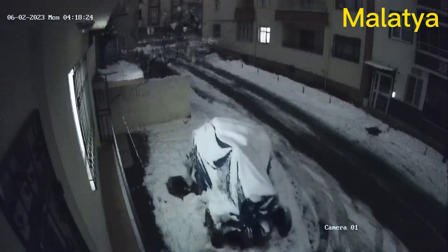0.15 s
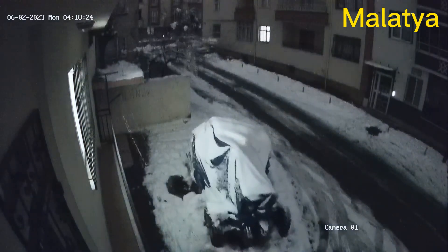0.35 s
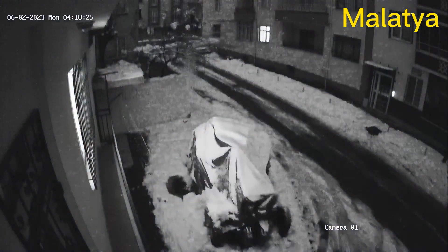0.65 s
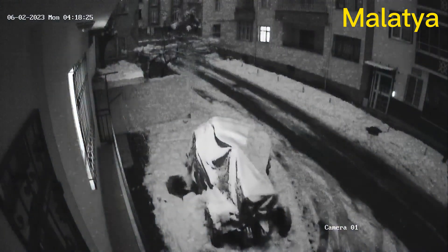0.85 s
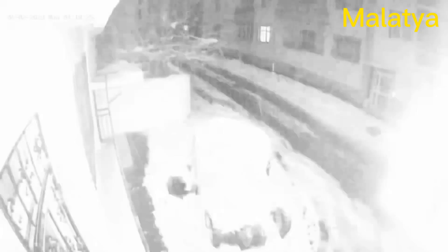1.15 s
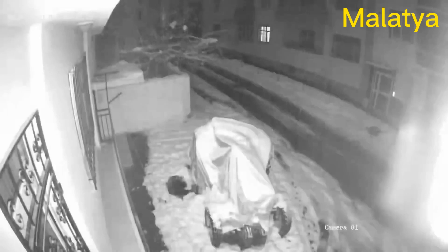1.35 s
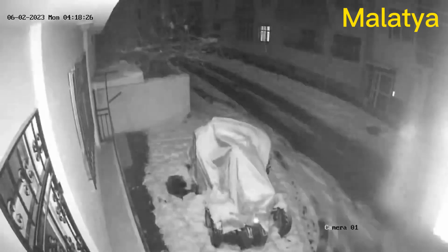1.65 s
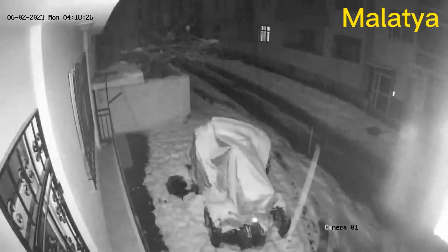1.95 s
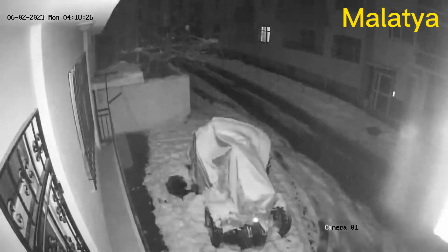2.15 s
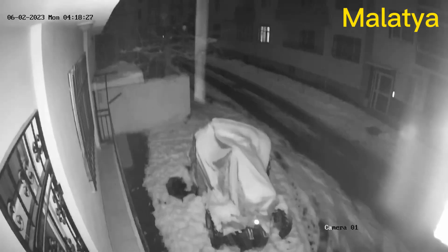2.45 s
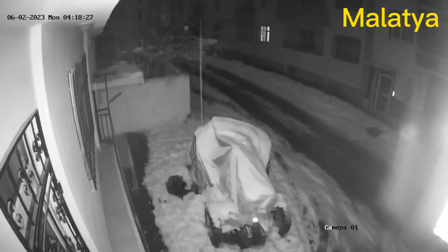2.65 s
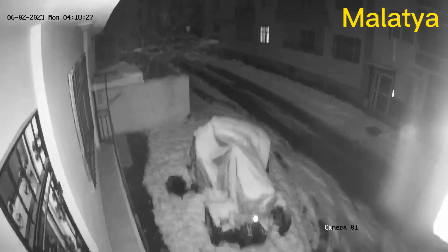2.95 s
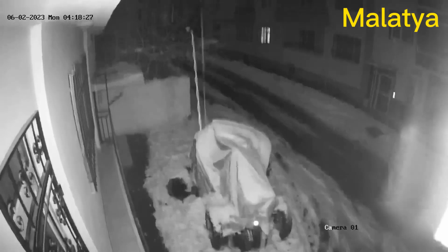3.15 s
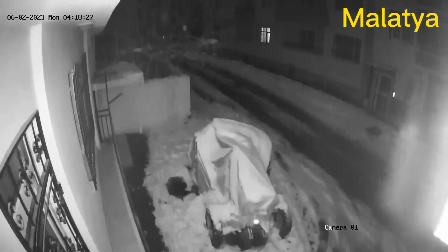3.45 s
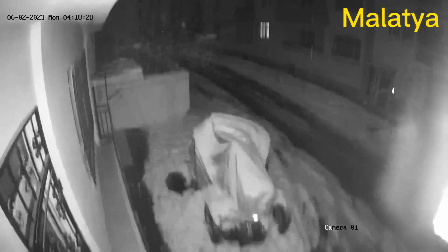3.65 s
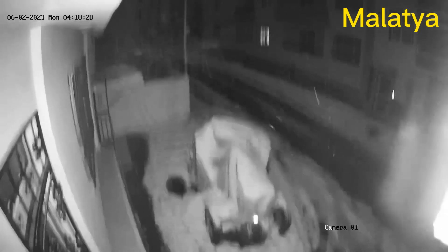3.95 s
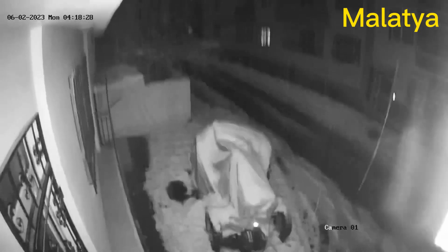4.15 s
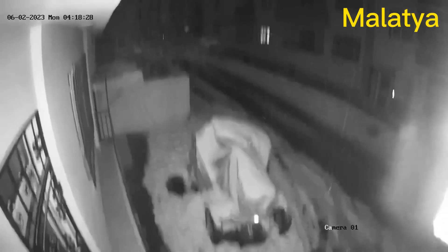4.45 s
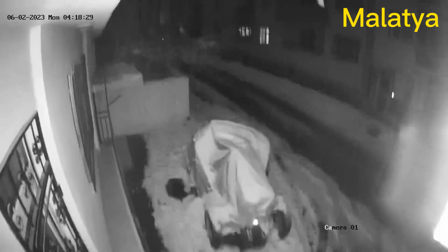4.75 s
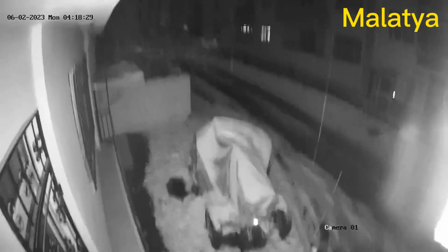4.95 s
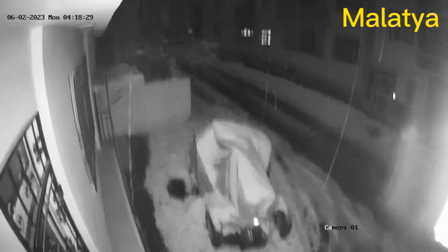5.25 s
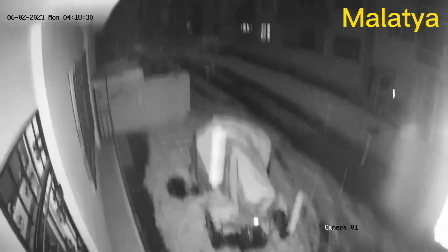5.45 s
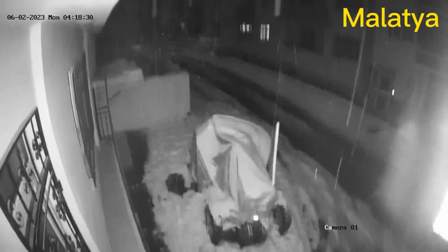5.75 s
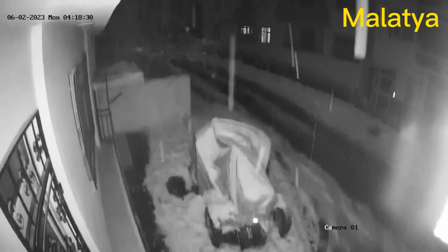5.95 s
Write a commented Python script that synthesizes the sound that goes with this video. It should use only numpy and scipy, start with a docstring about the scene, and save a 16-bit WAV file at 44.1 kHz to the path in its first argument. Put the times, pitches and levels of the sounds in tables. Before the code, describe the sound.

Outside flats on a snowy street at night, a fairly quiet gritty roar of shaking walls is scattered with loose metal clatter and debris ticks. A metal shutter suddenly chatters and bangs, a sharp crack follows, then the ground rumble surges. The roar stays loud with brief dropouts, ending in crowded cracks and ringing metal blows. A narrow, overdriven outdoor camera microphone dulls and flattens it.

```python
"""An earthquake shakes a street of flats, heard by a security camera on an outside wall.
From the start walls and ground roar, loose metalwork clatters, debris ticks and the camera sways.
Blows ring the metal and masonry cracks; then metal squeaks and, at 2.5 s, a shutter chatters and bangs.
The main ground wave lifts the rumble at 3.3 s; soon the sound drops out for moments.
The hardest blows come near the end. A narrow-band sound path limits the loudest peaks throughout."""
import sys
import numpy as np
from scipy import signal
from scipy.io import wavfile
from scipy.ndimage import uniform_filter1d, minimum_filter1d

SR = 44100
rng = np.random.default_rng(int(sys.argv[2]) if len(sys.argv) > 2 else 0)


def transcribe(u):
    """Save the signal u as a 16-bit wav file named by the first command-line argument.

    u: samples, shape (n,) or (channels, n), limited to [-1, 1]; the rate is SR.
    q: integer samples, one column per channel.
    """
    v = np.clip(np.atleast_2d(u).T, -1, 1)
    q = np.round(v * 32767).astype(np.int16)
    wavfile.write(sys.argv[1], SR, q)


N = 268128

# ringing tones (modes) of the loose metalwork: [f/Hz, level/dB, time to fall by 60 dB/s]
METAL_MODES = [(426, -7, 0.16), (696, 4, 0.017), (869, -0.5, 0.17), (1343, -5, 0.066), (1419, -4.5, 0.18),
               (1548, -3, 0.088), (1761, -1.5, 0.021), (2360, 1.5, 0.01), (2690, -9, 0.058),
               (2871, 2.5, 0.031), (3340, -3.5, 0.035), (3447, -3.5, 0.018), (3780, -6, 0.047)]
# ringing tones of the shutter's slats: [f/Hz, level/dB, time to fall by 60 dB/s]
SLAT_MODES = [(1930, -13, 0.29), (2084, -8, 0.063), (2350, -1, 0.06), (2450, -4.5, 0.017), (2835, 5, 0.19),
              (3090, 6, 0.04), (3490, 2, 0.049), (3645, 1.5, 0.055), (3984, 4.5, 0.026)]


def undb(db):
    """Turn decibels into a gain."""
    return 10 ** (np.asarray(db) / 20)


def unit(x):
    """Scale a sound to an average (rms) strength of 1."""
    return x / np.sqrt(np.mean(x ** 2))


def curves(table):
    """Join the points of a [t/s, value, ...] table by straight lines, one curve per value column."""
    s, *columns = np.transpose(table)
    return [np.interp(np.arange(N) / SR, s, column) for column in columns]


def surge(at_s, db, rise_s, fall_s):
    """A level in dB that climbs to a peak and falls away."""
    since = np.arange(N) / SR - at_s
    return db * np.exp(-np.abs(since) / np.where(since < 0, rise_s, fall_s))


def walk(rate):
    """A smooth random curve: steps at `rate` per second, smoothed twice, with a spread near 1."""
    k = int(SR / rate)
    steps = np.repeat(rng.standard_normal(N // k + 1), k)
    return 1.6 * uniform_filter1d(uniform_filter1d(steps, k), k)[:N]


def resonance(x, hz, width):
    """Let through a band around one pitch, with gain 1 at its centre (width in Hz)."""
    return signal.lfilter(*signal.iirpeak(hz, hz / width, fs=SR), x)


def ring(push, mode):
    """A push sets one mode ringing; the longer it rings, the narrower its band."""
    hz, db, t60 = mode
    width = np.log(1000) / (np.pi * max(t60, .01))
    return undb(db) * resonance(push, hz, width) / np.sqrt(width)


def bursts(count, decay):
    """Rows of noise that start at once and die away, one per event (decay in s, to 37 %)."""
    t = np.arange(SR // 3) / SR
    decay_s = np.maximum(np.reshape(decay, (-1, 1)), .0005)
    return rng.standard_normal((count, len(t))) * np.exp(-t / decay_s)


def add(out, s, db, sound):
    """Mix in a short sound at s, scaled by the strength of its loudest 2 ms."""
    at = int(s * SR)
    peak = np.sqrt(2 * np.max(uniform_filter1d(sound ** 2, size=90)))
    out[at:at + len(sound)] += undb(db) * sound / peak


def roar(roar_db, debris_db, rumble_db):
    """Countless far impacts blur into noise bands that throb together and flicker alone."""
    # tone colour of the roar, relative within each of its three parts: [f/Hz, level in 1 Hz/dB]
    roar_colour = [(24, -36), (40, -11), (154, -6.5), (218, -14.5), (412, 2), (490, -5), (693, 3.5),
                   (793, -3.5), (1590, 1.5), (1920, -5.5), (3360, -2), (3700, -2), (4000, -5.5),
                   (5200, -38), (8800, -120)]
    hz_points, db_points = np.transpose(roar_colour)
    parts = np.zeros((3, N))  # rumble, roar of the walls, hiss of debris
    throb = walk(18)
    for hz in 40 * 2 ** np.arange(0, 6.9, 1 / 3):  # three bands per octave
        colour_db = np.interp(np.log(hz), np.log(hz_points), db_points)
        db = colour_db + 0.67 * throb + 0.97 * walk(12)
        band = resonance(resonance(rng.standard_normal(N), hz, hz / 3), hz, hz / 3)
        parts[int(hz > 300) + int(hz > 1800)] += undb(db) * band
    levels = (rumble_db, roar_db, debris_db)
    return sum(undb(db) * unit(part) for db, part in zip(levels, parts))


def clatter(roar_db):
    """Small random knocks ring single modes of the metalwork, as strong as the shaking."""
    rate, scatter_db, contact_s = 50, 2.5, 0.032  # knocks per s in all, spread of sizes, contact decay
    level_db = -9  # against the roar of the walls
    out = 0
    for mode in METAL_MODES:
        hits = rng.random(N) < rate / len(METAL_MODES) / SR
        sizes = undb(scatter_db * rng.exponential(size=N)) * hits
        contact = signal.lfilter([1], [1, -np.exp(-1 / (contact_s * SR))], sizes)
        out = out + ring(contact * rng.standard_normal(N), mode)
    return unit(out) * undb(roar_db + level_db)


def grit(debris_db):
    """Falling plaster and ice tick nearby: brief broad bursts of noise at random moments."""
    rate, scatter_db, contact_s = 77, 4.5, 0.0035  # ticks per s, spread of sizes, decay of each tick
    level_db = -13.5  # against the hiss of debris
    hits = rng.random(N) < rate / SR
    sizes = undb(scatter_db * rng.exponential(size=N)) * hits
    contact = signal.lfilter([1], [1, -np.exp(-1 / (contact_s * SR))], sizes)
    ticks = resonance(contact * rng.standard_normal(N), 3400, 3000)
    return unit(ticks) * undb(debris_db + level_db)


def sway(roar_db):
    """The camera rocks on its bracket: pressure swings below hearing, wider as the shaking grows."""
    base_db, follows, wander_db = -25.5, 0.36, 4  # level at 0 dB roar, dB per dB of roar, slow wander
    jolt_db = surge(2.6, 12, rise_s=.015, fall_s=0.3)  # one hard jerk of the bracket
    noise = rng.standard_normal(N)
    rocking = resonance(noise, 10, 4) + .6 * resonance(noise, 4.3, 6.3)
    db = base_db + follows * roar_db + wander_db * walk(4) + jolt_db
    return unit(rocking) * undb(db)


def nearness(hz, centre_hz, octaves):
    """How strongly a part struck at one pitch drives a mode at another."""
    return np.exp(-.5 * (np.log2(hz / centre_hz) / max(octaves, .02)) ** 2)


def blows():
    """Each blow is a short gritty contact that rings the metalwork's modes near its pitch."""
    # blows on the metalwork: [t/s, peak level/dB, f of the struck part/Hz]
    blow_list = [(0.039, -23.5, 1550), (0.361, -24, 2260), (0.565, -24, 1330), (0.83, -23.5, 1570),
                 (1.18, -21.5, 2790), (1.294, -22, 2890), (1.449, -20.5, 2830), (1.586, -25, 2610),
                 (1.702, -17, 1400), (1.769, -22.5, 1340), (1.958, -23, 1410), (2.244, -20, 1400),
                 (2.876, -8.5, 1810), (3.122, -17.5, 1480), (3.814, -16, 1540), (4.119, -19, 397),
                 (4.184, -9, 680), (4.672, -7, 3750), (5.117, -19, 394), (5.174, -12.5, 711),
                 (5.258, -3, 700), (5.558, -7, 1570), (5.591, -11, 1580), (5.699, 1.5, 2780),
                 (5.774, -6.5, 3830), (5.847, -13, 1280), (5.888, -16, 400), (5.914, 1, 3540),
                 (5.969, 0.5, 3060)]
    spread_octaves, contact_s = .2, 0.0089
    out = np.zeros(N + SR)
    for (s, db, hz), push in zip(blow_list, bursts(len(blow_list), contact_s)):
        ringing = sum(nearness(mode[0], hz, spread_octaves) * ring(push, mode) for mode in METAL_MODES)
        add(out, s, db, ringing)
    return out[:N]


def cracks():
    """Cracks, thuds and sharp ticks do not ring: a sudden burst of noise in one broad band dies at once."""
    # cracks and thuds in the masonry, and sharp broad ticks: [t/s, peak level/dB, centre f/Hz, decay/s]
    crack_list = [(0.049, -15.5, 2000, 0.0073), (0.089, -13.5, 2200, .005), (0.299, -16, 2200, 0.011),
                  (2.375, -16, 2930, 0.0032), (2.585, -9, 1000, 0.055), (2.587, -15, 60, 0.039),
                  (2.874, 6.5, 2940, 0.0053), (2.884, -12, 2530, 0.027), (2.964, -1, 3270, 0.00071),
                  (3.3, -4.5, 3100, 0.0073), (3.336, -14, 100, .025), (3.336, -6.5, 1800, 0.0067),
                  (3.534, -8, 2510, 0.014), (3.699, -4.5, 2450, 0.0033), (4.755, -3, 2020, 0.0067),
                  (4.8, -6, 2000, 0.013), (4.872, 1, 2900, 0.006), (5.117, -0.5, 1800, 0.0027),
                  (5.229, 0, 2500, 0.0086), (5.31, 2.5, 2480, 0.011), (5.351, -9, 2620, 0.0048),
                  (5.55, -3, 2550, 0.0082), (5.615, -4.5, 2460, 0.0063), (5.662, -2, 2500, 0.0057),
                  (5.704, 2, 2680, 0.0066), (5.856, -3, 2600, .008)]
    width = 0.74  # of the band, as a share of its centre
    out = np.zeros(N + SR)
    decays = [row[-1] for row in crack_list]
    for (s, db, hz, _), push in zip(crack_list, bursts(len(crack_list), decays)):
        add(out, s, db, resonance(push, hz, width * hz))
    return out[:N]


def squeaks():
    """Uneven friction holds one resonance sounding while metal parts rub."""
    # rubs and squeaks: [start t/s, end t/s, level/dB, f/Hz, width of each of two filters/Hz]
    squeak_list = [(1.284, 1.35, -30.5, 2930, 70), (1.364, 1.473, -34, 2860, 50),
                   (1.696, 1.813, -37, 412, 40), (2.102, 2.218, -31, 2950, 90),
                   (2.813, 2.88, -30, 2926, 50), (3.184, 3.222, -24.5, 2920, 120),
                   (4.25, 4.297, -25, 1553, 40), (5.526, 5.611, -17, 1547, 29.6),
                   (5.657, 5.71, -25, 1540, 30), (5.799, 5.896, -15.5, 1303, 150)]
    attack_s, sag_db, release_s = .003, -2.5, 0.039  # the sag is reached at the end of the rub
    out, s = 0, np.arange(N) / SR
    for start, end, db, hz, width in squeak_list:
        times = [start, start + attack_s, end, end + release_s]
        rubbing = np.interp(s, times, [0, 1, undb(sag_db), 0])
        tone = resonance(resonance(rng.standard_normal(N), hz, width), hz, width)
        out = out + undb(db) * rubbing * unit(tone)
    return out


def shutter():
    """A sheet-metal shutter chatters: dense uneven ticks of slat on rail ring over a scraping hiss."""
    # strength of the chatter: [t/s, level/dB]
    chatter_levels = [(2.515, -49), (2.527, -13), (2.575, -12.5), (2.59, -2.5), (2.625, -0.5), (2.763, -21),
                      (2.795, -24), (2.81, -44)]
    rate = 1600  # ticks per s
    s = np.arange(N) / SR
    ticks = (rng.random(N) < rate / SR) * rng.standard_normal(N)
    ringing = sum(ring(ticks, mode) for mode in SLAT_MODES)
    scrape = resonance(resonance(ticks, 3300, 1500), 2980, 2000)
    moving = (s > chatter_levels[0][0]) & (s < chatter_levels[-1][0])
    return unit(unit(ringing) + 1.06 * unit(scrape)) * undb(curves(chatter_levels)[0]) * moving


def slams():
    """The shutter bangs against its rails, which rings all the slats at once."""
    # bangs of the shutter: [t/s, peak level/dB]
    slam_list = [(2.528, -12), (2.54, -2.5), (2.694, -16)]
    contact_s = 0.0021
    out = np.zeros(N + SR)
    for (s, db), push in zip(slam_list, bursts(len(slam_list), contact_s)):
        add(out, s, db, sum(ring(push, mode) for mode in SLAT_MODES))
    return out[:N]


def dropouts():
    """A gain that sinks and comes back each time the sound drops out."""
    # moments of lost sound: [start t/s, end t/s, depth as level/dB, fade out/s, fade in/s]
    drop_list = [(3.638, 3.642, -12, .022, .008), (3.795, 3.807, -8, .004, .012),
                 (3.965, 3.975, -4, .01, .01), (4.335, 4.345, -4, .004, .006),
                 (5.144, 5.149, -9, .015, .01), (4.2, 4.2195, -27, .002, .001),
                 (4.2215, 4.2258, -28, .001, .001)]
    s, db = np.arange(N) / SR, np.zeros(N)
    for start, end, depth_db, fade_out, fade_in in drop_list:
        times = [start - fade_out, start, end, end + fade_in]
        db += np.interp(s, times, [0, depth_db, depth_db, 0])
    return undb(db)


def scene():
    """All that shakes, with its dropouts; the slow sway carries on through them."""
    # strength of the shaking: [t/s, roar of the walls as level/dB, hiss of debris above the roar/dB]
    shaking = [(0, -31.5, 4), (.95, -30, 1.5), (1.3, -33.5, 4.5), (2.57, -33.5, 4), (2.75, -32.5, 7),
               (3.0, -33, 9.5), (3.15, -27.5, 2), (3.28, -25.5, 5), (3.35, -18, 1), (3.44, -19.5, 2.5),
               (3.56, -18, 5.5), (3.72, -18, 3.5), (3.84, -16.5, 2), (3.96, -23, 4), (4.17, -19.5, 2),
               (4.4, -25, 4.5), (4.55, -22, 3.5), (4.78, -15.5, 1), (5.05, -18, 1), (5.29, -16, 2.5),
               (5.48, -18, 2.5), (5.58, -15.5, 3.5), (5.8, -19.5, 3.5), (5.96, -16.5, 8), (6.08, -22.5, 5)]
    roar_db, brighter_db = curves(shaking)
    debris_db = roar_db + brighter_db
    wave_db = surge(3.33, 5.5, rise_s=.08, fall_s=0.5)  # the main ground wave lifts the rumble
    rumble_db = roar_db - 13 + wave_db
    walls = roar(roar_db, debris_db, rumble_db) + clatter(roar_db) + grit(debris_db)
    street = walls + blows() + cracks() + squeaks() + shutter() + slams()
    return (street * dropouts() + sway(roar_db))[None]


def record(dry):
    """The overloaded camera rounds peaks and passes little above 4 kHz; a limiter then holds peaks."""
    limit, ceiling, look_ahead_s = .645, .71, .0003  # first two as shares of full scale
    rounded = np.tanh(dry)
    narrow = signal.sosfilt(signal.butter(12, 3843, fs=SR, output="sos"), rounded)
    narrow = signal.sosfilt(signal.cheby2(16, 70, 4900, fs=SR, output="sos"), narrow)
    # the gain ramps down ahead of each peak; what still overshoots is cut flat and ticks in the treble
    span = int(look_ahead_s * SR)
    wanted = limit / np.maximum(np.abs(narrow), limit)
    gain = uniform_filter1d(minimum_filter1d(wanted, size=span), size=3 * span)
    cut = np.clip(gain * narrow, -ceiling, ceiling)
    # nothing much is left above 15.9 kHz
    return signal.sosfilt(signal.ellip(8, .2, 70, 15900, fs=SR, output="sos"), cut)


dry = scene()
out = record(dry)
transcribe(out)
```